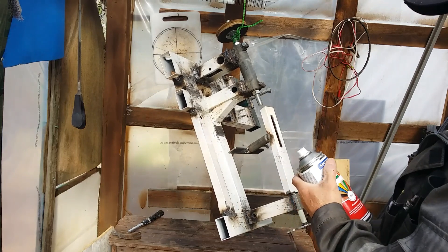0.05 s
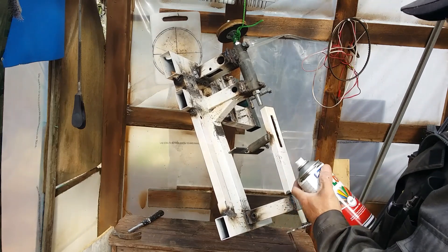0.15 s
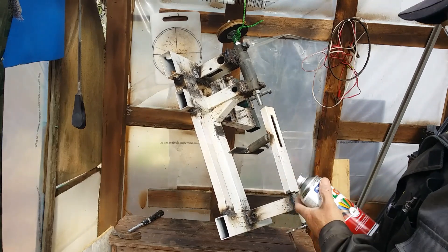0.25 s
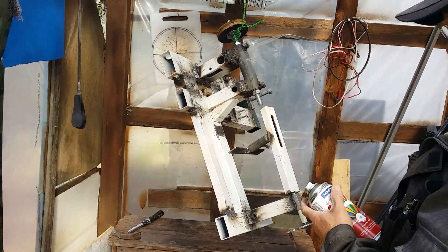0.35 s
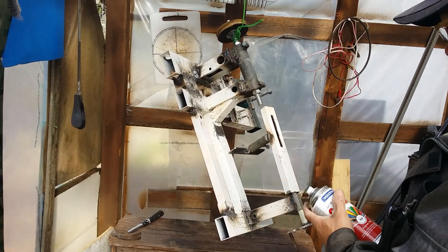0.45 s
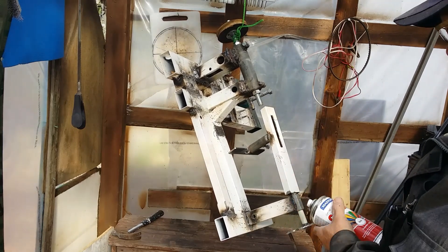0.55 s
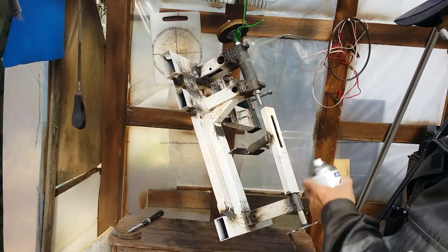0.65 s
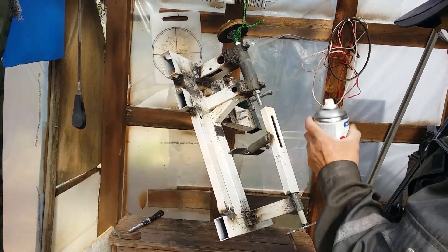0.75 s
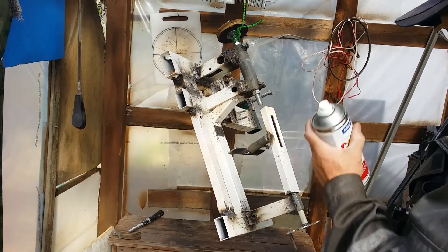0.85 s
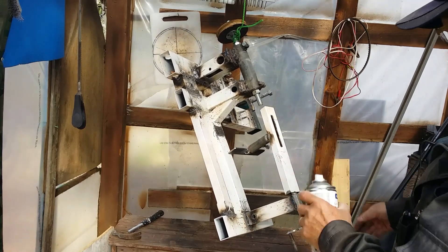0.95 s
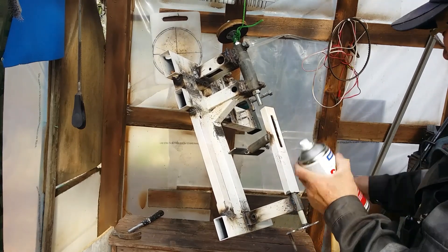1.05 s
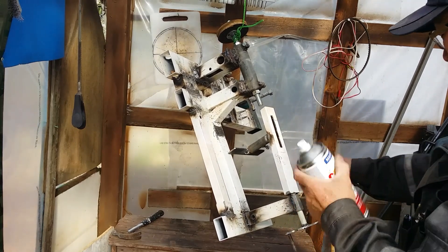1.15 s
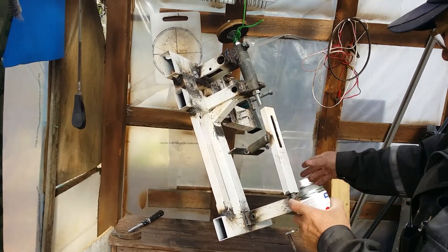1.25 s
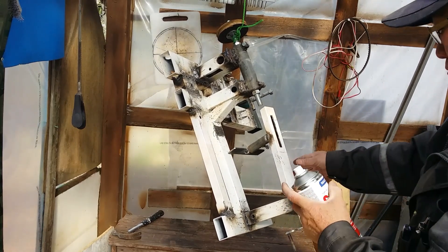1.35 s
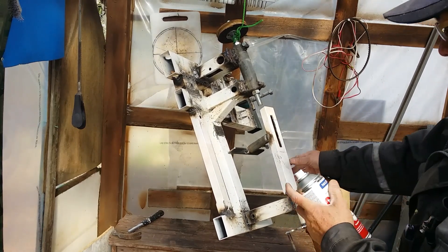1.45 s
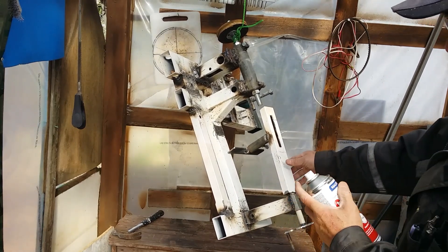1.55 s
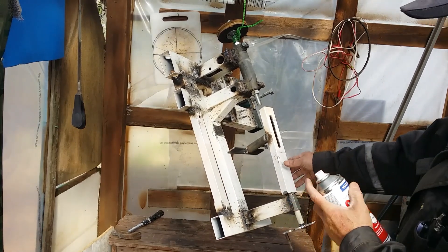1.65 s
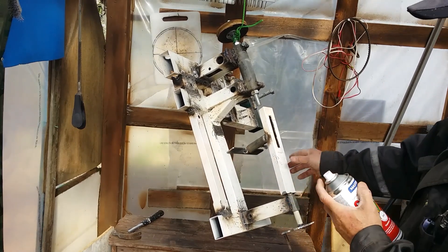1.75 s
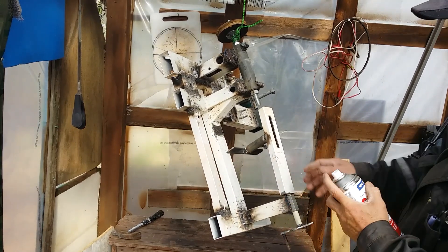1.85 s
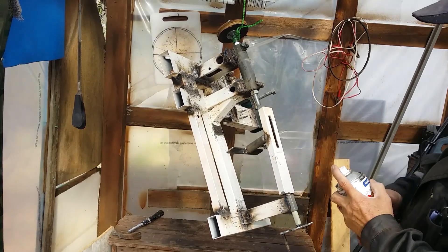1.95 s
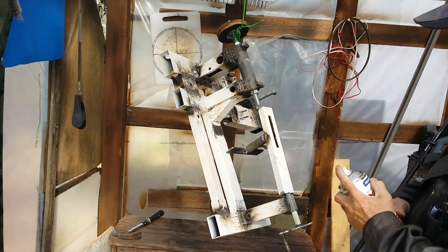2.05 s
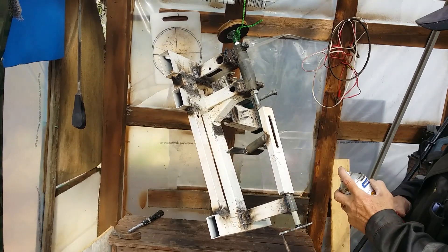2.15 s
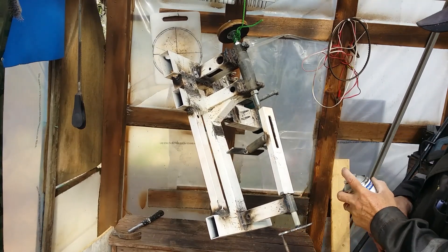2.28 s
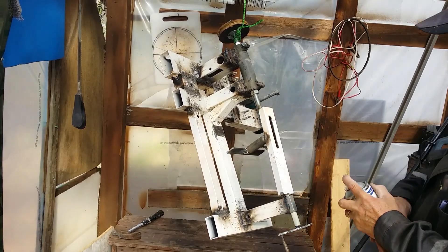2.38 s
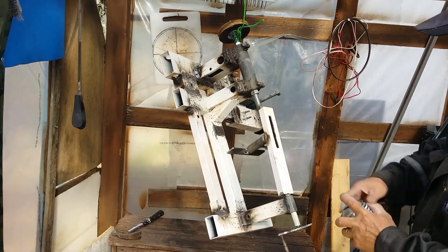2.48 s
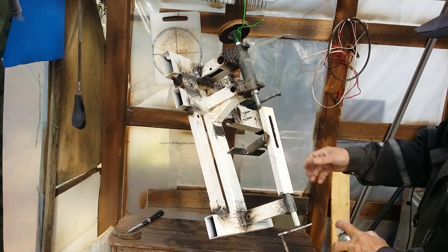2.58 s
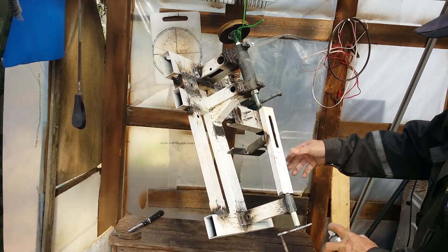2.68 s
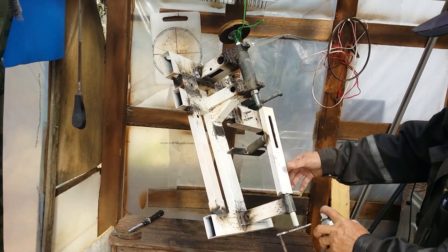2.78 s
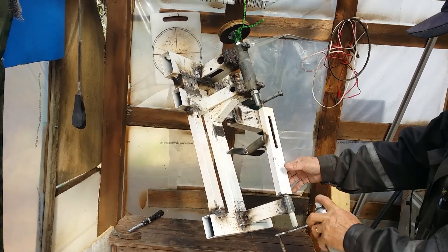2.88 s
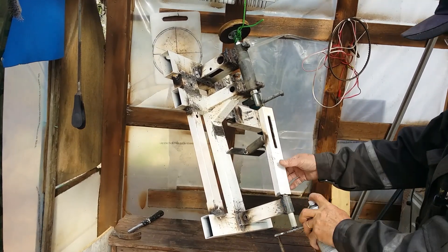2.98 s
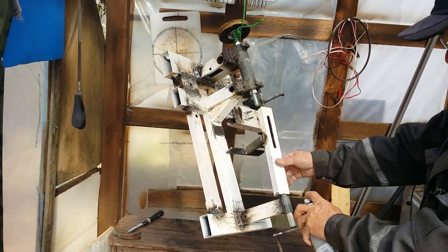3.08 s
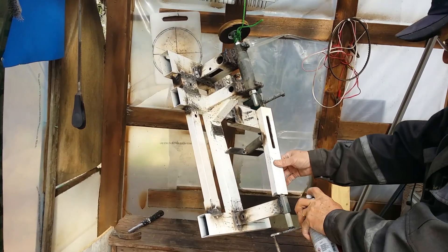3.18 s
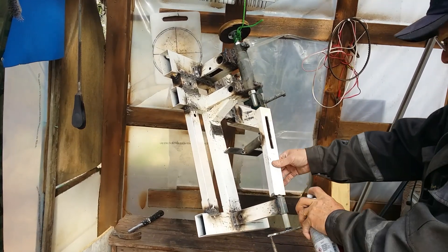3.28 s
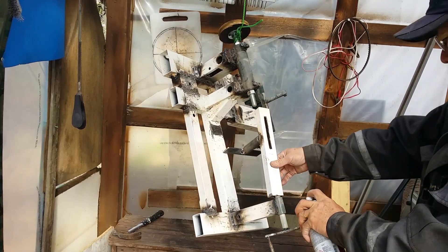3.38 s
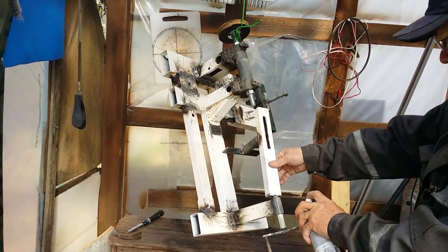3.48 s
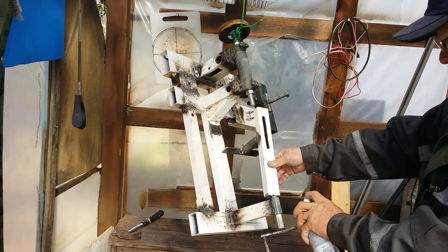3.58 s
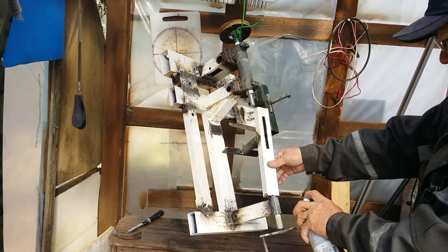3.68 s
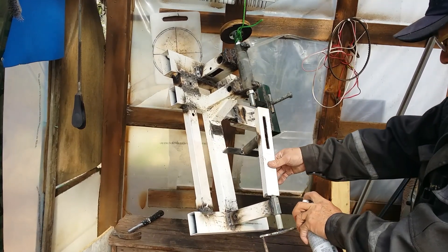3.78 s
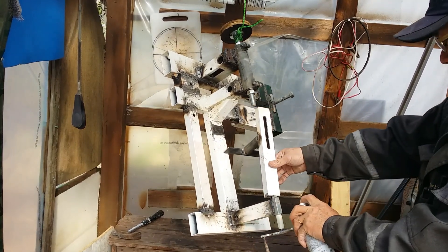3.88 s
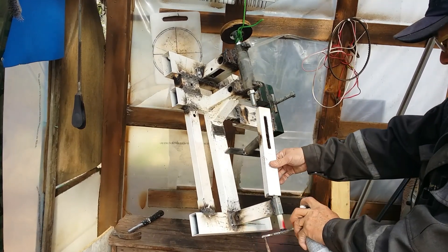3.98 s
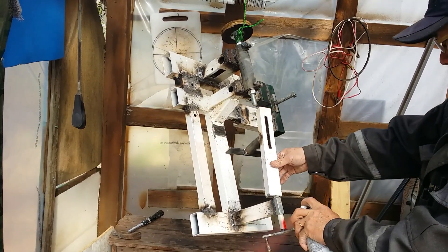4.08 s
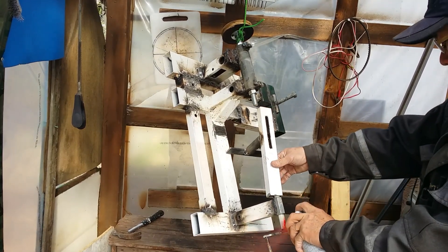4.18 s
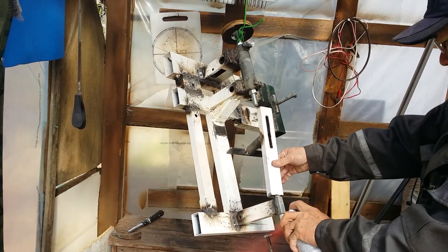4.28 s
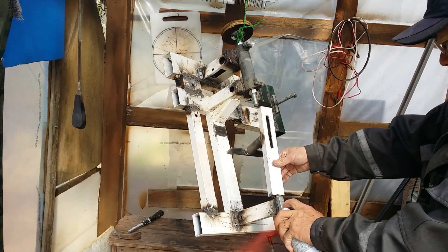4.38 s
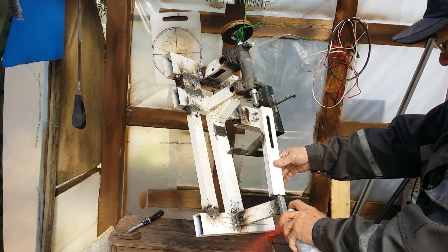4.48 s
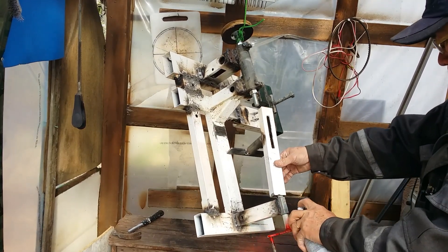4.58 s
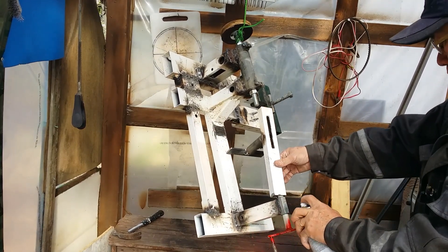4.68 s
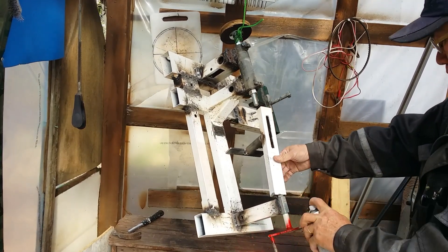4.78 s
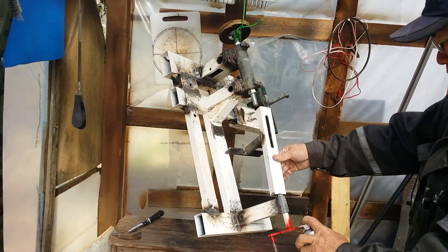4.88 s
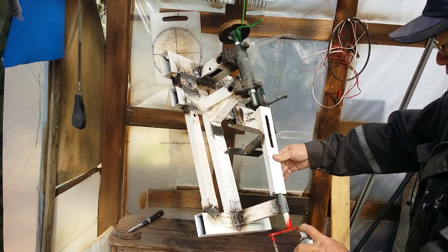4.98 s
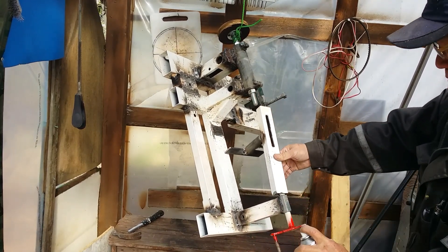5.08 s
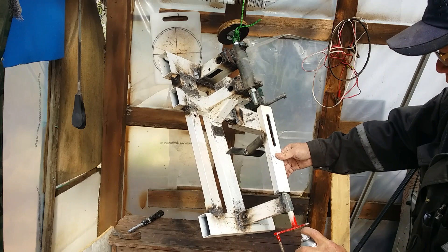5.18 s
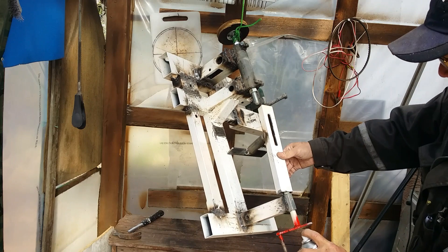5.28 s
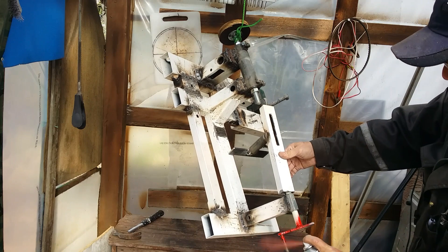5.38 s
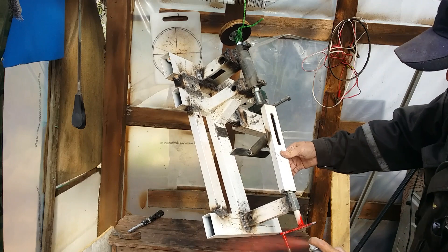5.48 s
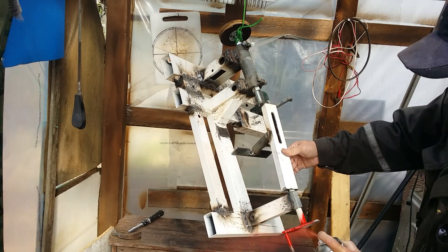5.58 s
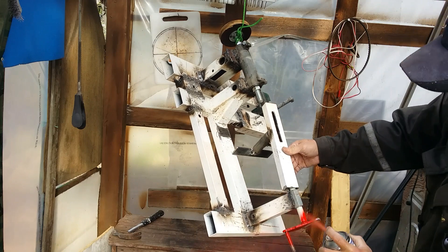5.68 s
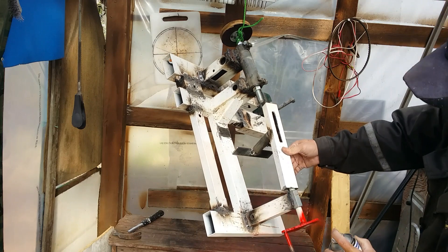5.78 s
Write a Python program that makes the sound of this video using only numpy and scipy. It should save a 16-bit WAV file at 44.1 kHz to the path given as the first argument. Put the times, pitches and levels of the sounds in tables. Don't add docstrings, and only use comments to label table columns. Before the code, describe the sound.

A spray can is shaken in two rattling bursts, its ball clacking on tin, then the nozzle hisses twice in a small shed.

```python
import sys
import numpy as np
from scipy import signal
from scipy.fft import rfft, irfft
from scipy.io import wavfile
from scipy.ndimage import uniform_filter1d

SR = 44100
rng = np.random.default_rng(int(sys.argv[2]) if len(sys.argv) > 2 else 0)


def wrap_up_sound(samples):
    columns = np.atleast_2d(samples).T
    tamed = np.clip(columns, -1, 1)
    steps = np.round(tamed * 32767).astype(np.int16)
    wavfile.write(sys.argv[1], SR, steps)


def field_ratio(decibels):
    return 10 ** (np.asarray(decibels, dtype=float) / 20)


N = 257544


def evened(x):
    return x / np.sqrt(np.mean(x ** 2) + 1e-20)


def read(points, hz):
    f, value = np.transpose(points)
    return np.interp(np.log(hz + 1), np.log(f + 1), value)


def level(tables, column):
    t = np.arange(N) / SR
    return sum(field_ratio(np.interp(t, r[:, 0], r[:, column], -200, -200)) for r in map(np.array, tables))


def strokes(rows):
    t, gain = np.arange(N) / SR, 0
    for s, db, rise, fall in rows:
        below = np.maximum((s - t) / max(rise, .005), (t - s) / max(fall, .005))
        gain = gain + field_ratio(db - 20 * below)
    return gain


def peaks_db(modes, hz):
    return sum(db / (1 + (2 * (hz - f) / width) ** 2) for f, width, db in modes)


def add(mix, s, sound):
    part = mix[:, round(s * SR):][:, :sound.shape[1]]
    part += sound[:, :part.shape[1]]


def noise(colour_db, patchy_db, size=512):
    # (frequency [Hz], correlation [0-1])
    likeness = [(60, 0.9), (150, 0.9), (380, 0.75), (950, 0.2), (2380, 0.03), (5980, 0.054), (15000, 0.02)]
    frames, hz = N * 4 // size + 5, np.fft.rfftfreq(size, 1 / SR)
    a, b, c, d, patches = rng.standard_normal((frames, len(hz), 5), dtype=np.float32).T
    patches = evened(uniform_filter1d(uniform_filter1d(patches, size=7, axis=0), size=12, axis=1))
    same = np.clip(read(likeness, hz), -1, 1)[:, None]
    left = a + 1j * b
    right = same * left + np.sqrt(1 - same ** 2) * (c + 1j * d)
    z = np.array([left, right]) * field_ratio(colour_db(hz)[:, None] + patchy_db * patches)
    return evened(signal.istft(z, nperseg=size, noverlap=size * 3 // 4)[1][:, :N])


def grains(per_s, spread_db):
    hits = field_ratio(spread_db * rng.exponential(1, N)) * (rng.random(N) < per_s / SR)
    return evened(1 + signal.lfilter([1], [1, -np.exp(-1 / (.003 * SR))], hits))


def knocks():
    # (time [s], strength [dB], dome ring [dB], wall pitch [Hz])
    wall_hits = [(0.0024, -26, 8, 5200), (0.1386, -35, 12.5, 5040), (0.1782, -26.5, -2, 4680),
                 (0.2011, -20, -1, 8340), (0.2619, -32.5, 5, 5170), (0.3519, -30, 10.5, 6100),
                 (0.359, -32.5, -12, 4830), (0.413, -36, 3, 5230), (0.463, -39, 5, 4500),
                 (0.495, -34, 6, 4500), (0.5174, -31, 6, 4570), (0.572, -39, 7, 4170),
                 (1.106, -32.5, 6.5, 5040), (1.1706, -28.5, 5, 3800), (1.1892, -22, 3.5, 5290),
                 (1.2199, -9, 3, 4830), (1.3673, -25, 1, 8100), (1.385, -14, -8.5, 4070),
                 (1.463, -32, 6.5, 3300), (1.513, -14, 1, 4790), (1.5284, -17.5, -3.5, 5200),
                 (1.5777, -33.5, 13, 4750), (1.7466, -23.5, 3.5, 5200), (1.8323, -26, 0, 4670),
                 (1.9202, -19, 0.5, 6300), (1.9773, -34.5, 5, 4860), (2.037, -25, 9, 5000),
                 (2.111, -39, 7.5, 4620), (2.151, -36.5, 5, 5400), (4.0612, -53.5, 9.5, 3450)]
    # (time [s], strength [dB], dome ring [dB], dome pitch [Hz])
    dome_hits = [(0.0417, -28, 13, 1630), (0.124, -42, 25, 2630), (0.3007, -31.5, 20.5, 1900),
                 (0.3194, -39, 13, 2280), (0.3797, -28, 10, 1490), (0.441, -35.5, 20, 1500),
                 (0.482, -33, 14.5, 1510), (0.539, -31.5, 4, 1970), (1.276, -17.5, 9.5, 1780),
                 (1.3476, -25, 13, 1720), (1.4263, -19.5, 13.5, 2190), (1.434, -19, 17, 2230),
                 (1.4407, -22.5, 22.5, 1600), (1.6177, -26.5, 17, 1840), (1.6275, -35, 10, 2510),
                 (1.6674, -36.5, 15, 2530), (1.6827, -33.5, 14, 1640), (1.7222, -35, 11, 2040),
                 (1.8872, -38.5, 17, 2020), (2.0173, -31, 5.5, 2160), (2.138, -45, 13.5, 2190),
                 (2.1898, -38.5, 14.5, 2110), (2.218, -40.5, 2, 2030), (2.9903, -60.5, 17, 1250),
                 (3.2218, -55, 15.5, 1750)]
    out = np.zeros((2, N))
    for s, db, dome_db, wall_hz in wall_hits:
        t60 = 0.16 * field_ratio(-0.06 * (db + 28))
        add(out, s, field_ratio(db + 7.0) * blow(dome_db, 2250, wall_hz, t60))
    for s, db, dome_db, dome_hz in dome_hits:
        add(out, s, field_ratio(db + 1.5) * blow(dome_db, dome_hz, 5000, t60=0.11))
    return out


def blow(dome_db, dome_hz, wall_hz, t60):
    # (frequency [Hz], level [dB])
    can_colour = [(290, -40), (500, -9.5), (855, -12), (974, -3.5), (1550, -5), (1900, -4.5), (2260, -2),
                  (3060, -2), (4660, -1.5), (7750, -4), (9920, -11.5), (13400, -10.5), (14700, -18),
                  (16000, -32.5)]
    # (frequency [Hz], width [Hz], height [dB])
    tin_modes = [(1570, 69, 4.5), (2190, 59, 2.5), (2410, 51, 3), (3420, 80, 2.5), (4400, 170, 0.5),
                 (4600, 47, 4.5), (5380, 98, 2.5), (5680, 66, 8.5), (6777, 52, 7.5), (7200, 260, 4),
                 (7870, 95, 6.5), (9960, 780, -2.5)]
    hz = np.fft.rfftfreq(4096, 1 / SR)
    rings = tin_modes + [(wall_hz, 1200, 7), (dome_hz, 1300, dome_db), (dome_hz, 300, 3)]
    click = causal(read(can_colour, hz) + peaks_db(rings, hz))
    ears = shed(-20.5, t60, rng.uniform(-1, 1, (4, 8192)))
    return signal.fftconvolve(click[None] / abs(click).max(), ears, axes=1)


def causal(db):
    cepstrum = irfft(np.log(field_ratio(np.maximum(db, -100))))
    cepstrum[1:len(db) - 1] *= 2
    cepstrum[len(db):] = 0
    return irfft(np.exp(rfft(cepstrum)))[:len(db)]


def shed(wet_db, t60, draw):
    # (frequency [Hz], factor on t60)
    damping = [(500, 0.31), (2200, 1.184), (6000, 1.194), (14000, 2.1)]
    t = np.arange(draw.shape[1]) / SR
    dense = np.clip(0.016 + 30 * t, 0, 1)
    taps = np.sign(draw[:2]) * (draw[2:] > 1 - 2 * dense) / np.sqrt(dense)
    taps = taps * field_ratio(5 * np.exp(-t / .005))
    hz, s, z = signal.stft(taps, SR, nperseg=128)
    decay = field_ratio(wet_db - 60 * s / (t60 * read(damping, hz)[:, None]))
    tail = signal.istft(z * decay, SR, nperseg=128)[1]
    tail = tail * (t > 0.001)
    tail[0, 5] += 1
    tail[1, 0] += 1
    return tail * signal.windows.tukey(2 * len(t), .3)[len(t):]


def spray(dull):
    # (time [s], flow [dB])
    presses = [
        [(4.106, -66), (4.146, -46), (4.212, -43), (4.274, -46), (4.63, -45.5), (4.74, -42.5), (4.792, -48.5),
         (4.854, -42), (4.91, -66)],
        [(5.562, -79), (5.578, -53.5), (5.594, -47.5), (5.632, -45), (5.734, -48.5), (5.766, -44), (5.84, -43)],
    ]
    # (frequency [Hz], level [dB])
    jet_colour = [(880, -12), (1500, -6.5), (1880, -10), (2370, -4), (2910, -4), (4240, 0), (6060, 2.5),
                  (9950, -0.5), (14800, 0), (15500, 1), (16000, -15.5)]
    # (time of peak [s], level [dB], time to rise 20 dB [s], time to fall 20 dB [s])
    crossings = [
        (4.59, -59, 0.056, 0.053),
        (5.632, -60, 0.048, 0.055),
    ]
    jet = noise(lambda hz: read(jet_colour, hz), patchy_db=1.3) * grains(3000, 1.5)
    flow = level(presses, 1)
    patter = field_ratio(27.5) * flow ** 2.107
    return flow * jet + (patter + strokes(crossings)) * dull


def rub(dull):
    # (time of peak [s], level [dB], time to rise 20 dB [s], time to fall 20 dB [s])
    moves = [(0.53, -51.5, 0.8, 0.13), (0.72, -64.5, .5, .5), (0.845, -63, 0.02, 0.15),
             (0.885, -59, -0.05, 0.1), (1.5, -44.5, 0.18, 0.18), (2.17, -56, 0.12, 0.15),
             (2.26, -68.5, 1.1, 0.32), (2.62, -75.5, 0.1, 0.3), (2.745, -62, 0.1, 0.13),
             (2.895, -51.5, 0.05, 0.0932), (3.0, -70, -0.16, 0.24), (3.3, -77.5, 0.2, 0.2),
             (4.0, -75, 0.06, 0.4), (4.04, -80.5, .1, -0.6), (4.07, -66.5, -0.1, -0.1),
             (4.92, -68, .04, 0.23), (5.03, -79, 0.7, .25), (5.27, -82, 0.3, 1.5)]
    # (frequency [Hz], level [dB])
    rub_colour = [(290, -34), (500, -2), (784, -8.5), (906, 1.5), (1420, -2.5), (2290, -1.5), (6140, 0.5),
                  (14500, -12), (16000, -32.5)]
    bright = noise(lambda hz: read(rub_colour, hz), patchy_db=1.2) * grains(150, 0.3)
    return strokes(moves) * (bright + field_ratio(-16) * dull)


def scrape():
    # (time of peak [s], level [dB], time to rise 20 dB [s], time to fall 20 dB [s])
    drags = [
        (2.87, -41.5, .025, 0.045),
        (2.9, -49, 0.05, 0.038),
    ]
    # (frequency [Hz], width [Hz], height [dB])
    frame_modes = [(833, 31, 15.5), (1430, 83, 0.5), (2000, 84, 5.5), (2745, 41, 15.5), (4270, 28, -0.5)]
    # (frequency [Hz], level [dB])
    frame_colour = [(240, -0.5), (400, -6), (906, -2), (1420, 2.5), (2320, -6), (2800, -4.5), (6150, -6),
                    (13700, -25.5), (16000, -55)]
    body = noise(lambda hz: peaks_db(frame_modes, hz) + read(frame_colour, hz), patchy_db=1.5)
    return strokes(drags) * grains(400, 0.8) * body


def bumps():
    # (time [s], peak [dB], pitch [Hz], t60 [s], rattle [dB])
    thuds = [(1.351, -31, 169, 0.045, -6), (1.384, -42, 149, 0.057, -23), (1.407, -32.5, 162, 0.042, -10),
             (1.738, -44.5, 160, 0.081, 2.5), (1.749, -51, 377, 0.1, -1), (1.774, -47, 213, 0.063, -28),
             (2.836, -45, 181, 0.046, -28), (2.899, -53, 213, 0.14, -23), (4.57, -52.5, 203, 0.22, -21)]
    out, t = np.zeros((2, N)), np.arange(8000) / SR
    wood = signal.butter(2, [280, 1100], "bandpass", fs=SR, output="sos")
    pan_db = np.array([[.5], [-.5]]) * -5
    for s, db, hz, t60, rattle_db in thuds:
        push = np.sin(2 * np.pi * hz * t - np.array([[.4], [0]]))
        push = push + field_ratio(rattle_db) * evened(signal.sosfilt(wood, rng.standard_normal(len(t))))
        push = push * field_ratio(-60 * t / max(t60, .02)) * (1 - np.exp(-t / 0.0036))
        add(out, s, field_ratio(db + 5.5 + pan_db) * push)
    return out


def yard():
    # (time [s], level [dB])
    rumble_level = [
        [(0.0, -61), (0.48, -60), (0.95, -66.5), (1.2, -64), (1.4, -53), (1.73, -60.5), (2.2, -59),
         (2.36, -69.5), (2.744, -70), (2.966, -65.5), (3.4, -71.5), (3.914, -72), (4.312, -61), (4.7, -56),
         (5.04, -69.5), (5.32, -73.5), (5.772, -62), (5.84, -60.5)],
    ]
    # (frequency [Hz], level [dB])
    rumble_colour = [(26, -29.5), (45, -8.5), (91, -5), (123, -11.5), (334, -8.5), (482, -13.5), (518, -13),
                     (596, -17), (736, -14), (2110, -29), (3000, -28), (3900, -54), (6600, -120)]
    # (time [s], pitch [Hz], level [dB])
    glides = [
        [(0.42, 176.3, -74.5), (0.514, 176.8, -64), (0.676, 186.5, -63.5), (0.752, 188, -77), (0.858, 189, -66),
         (0.95, 195, -85)],
        [(2.36, 2970, -101), (2.384, 2730, -79), (2.43, 2670, -86), (2.45, 2460, -101)],
    ]
    # (time [s], pitch [Hz])
    engine_hz = [(0.0, 59.64), (1.0, 58.02), (1.4, 55.37), (2.15, 50.6), (2.93, 47.33), (3.5, 41.27),
                 (4.7, 43.5), (5.84, 47.6)]
    # (time of peak [s], level [dB], time to rise 20 dB [s], time to fall 20 dB [s])
    engine_swells = [(0.41, -65, 0.16, 0.41), (1.32, -62, .25, .1), (2.15, -59.5, .7, 0.27),
                     (2.93, -65.5, .25, .33), (4.72, -63.5, 1, 0.43), (5.83, -57, 0.14, .2)]
    # (frequency [Hz], level [dB])
    hiss_colour = [(710, -37.5), (1200, -4.5), (1550, -5.5), (2060, -13.5), (3640, -3.5), (8130, -6.5),
                   (13400, -7), (15000, -5.5)]
    t, tones = np.arange(N) / SR, 0
    for rows in glides:
        s, hz, db = np.transpose(rows)
        turns = np.cumsum(np.interp(t, s, hz)) / SR
        tones = tones + np.sqrt(2) * np.sin(2 * np.pi * turns) * level([rows], 2)
    turns = np.cumsum(np.interp(t, *np.transpose(engine_hz))) / SR
    tones = tones + np.sqrt(2) * np.sin(2 * np.pi * turns) * strokes(engine_swells)
    rumble = level(rumble_level, 1) * noise(lambda f: read(rumble_colour, f), patchy_db=1.0, size=2048)
    hiss = field_ratio(-76) * noise(lambda f: read(hiss_colour, f), patchy_db=1.0)
    return field_ratio(1.0) * rumble + tones + hiss


def scene():
    dull = noise(lambda hz: peaks_db([(2000, 2800, 40)], hz), patchy_db=1.8)
    return knocks() + field_ratio(1) * (rub(dull) + scrape() + spray(dull)) + bumps() + yard()


def attacks(x):
    power = uniform_filter1d((np.diff(x, prepend=0) ** 2).mean(0), size=256) + 1e-14
    jump = power > np.roll(power, 256) * field_ratio(2 * 5)
    return 1. * (uniform_filter1d(1. * jump, size=1024) > 1e-6)


def thin_treble(x, keep, lowest=58):
    # (frequency [Hz], depth [dB])
    depth = [(2500, 5.5), (2900, 3.2), (4000, 2.5), (5000, 4.4), (8500, 5.5), (10000, 4.3), (13500, 4.5),
             (15300, 4)]
    masking = .42
    hz, t, z = signal.stft(x, SR, nperseg=1024, noverlap=768)
    power = uniform_filter1d((abs(z[:, lowest:]) ** 2).mean(0), size=5, axis=1) + 1e-24
    near = uniform_filter1d(power, size=40, axis=0)
    limit = near * (power.mean(0) / near) ** masking / field_ratio(2 * read(depth, hz[lowest:]))[:, None]
    weak = 1. * (uniform_filter1d(power, size=3, axis=0) < limit)
    weak = uniform_filter1d(uniform_filter1d(weak, size=3, axis=0), size=5, axis=1) > .01
    lost = z * np.pad(weak, ((lowest, 0), (0, 0))) * np.interp(t, np.arange(N) / SR, keep)
    return x - .99 * signal.istft(lost, SR, nperseg=1024, noverlap=768)[1][:, :N]


def roll_off(x):
    return signal.sosfilt(signal.butter(12, 16520, fs=SR, output="sos"), x)


def record(dry):
    # (frequency [Hz], left over right [dB])
    port_balance = [(60, 1), (110, -1.5), (200, -2), (380, -1.5), (700, -1), (1290, -2.5), (2380, -0.5),
                    (4400, 3), (8120, -3), (15000, 1.5)]
    hz = np.fft.rfftfreq(N, 1 / SR)
    ports = field_ratio(read(port_balance, hz) * np.array([[.5], [-.5]]))
    ports = ports / np.sqrt(1 + (38 / (hz + 1)) ** 6)
    ports = ports * np.where(hz < 15750, 1, field_ratio(-18.5))
    squeezed = .6 * np.tanh(dry / .6)
    heard = irfft(rfft(squeezed) * ports, N)
    heard = thin_treble(heard, keep=1 - attacks(heard))
    return roll_off(heard)


dry = scene()
out = record(dry)
wrap_up_sound(out)
```